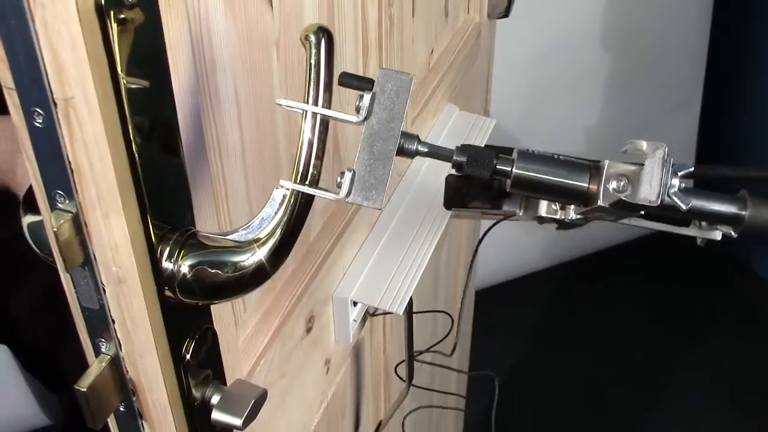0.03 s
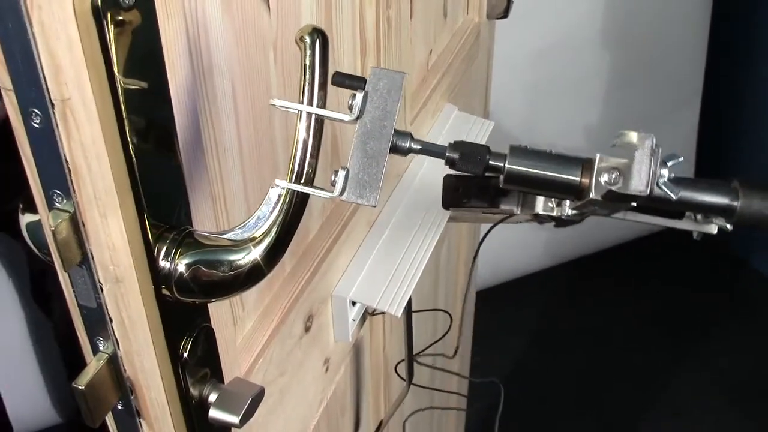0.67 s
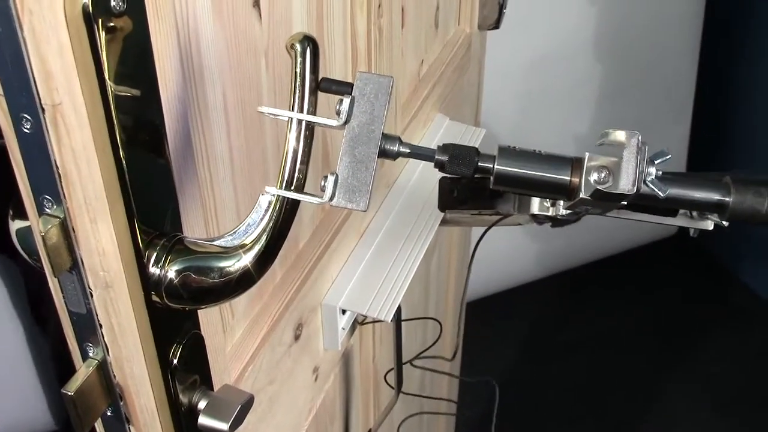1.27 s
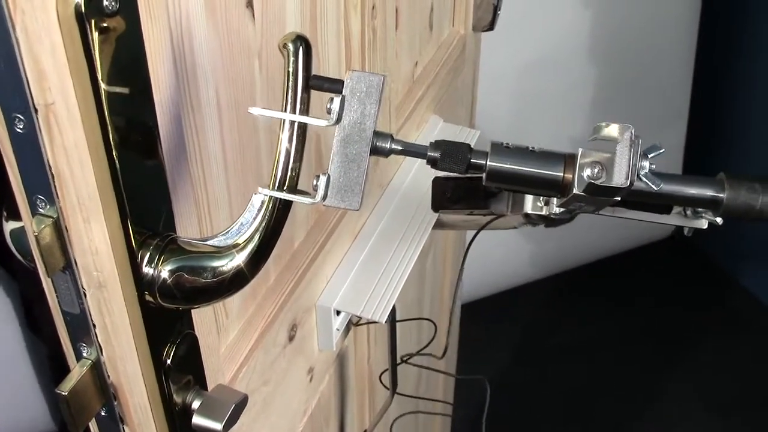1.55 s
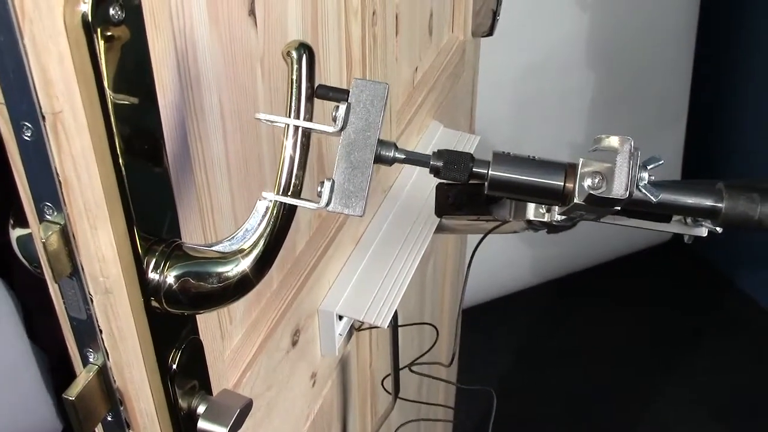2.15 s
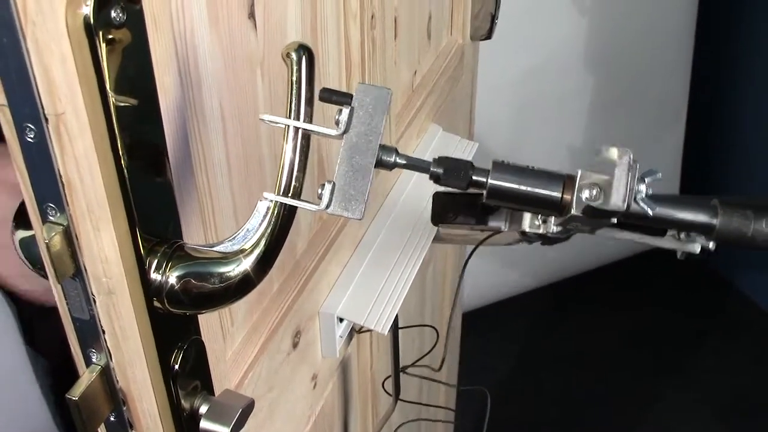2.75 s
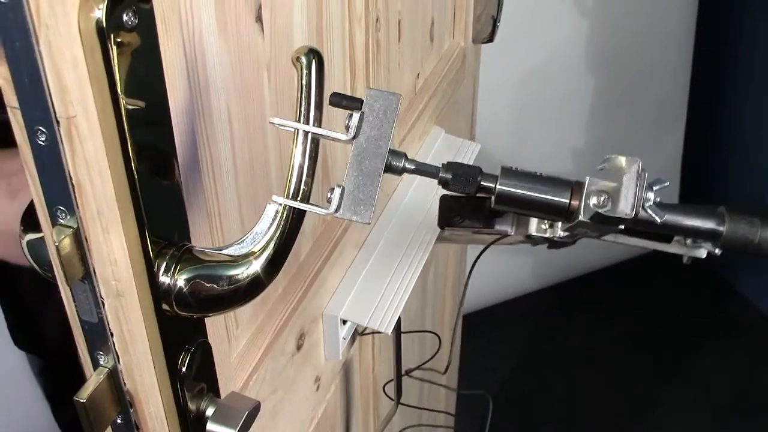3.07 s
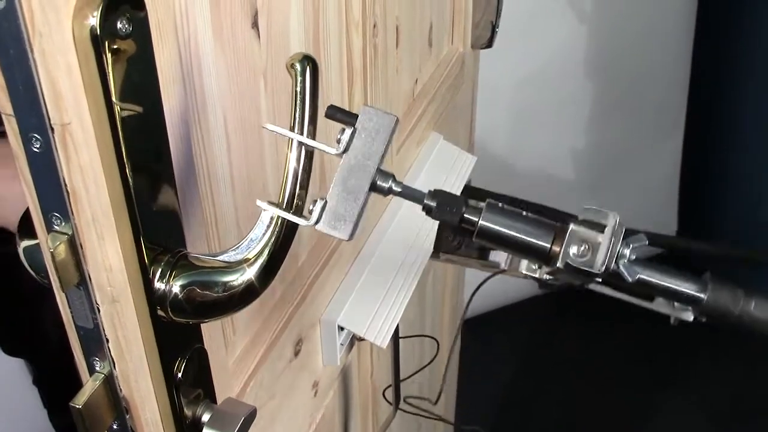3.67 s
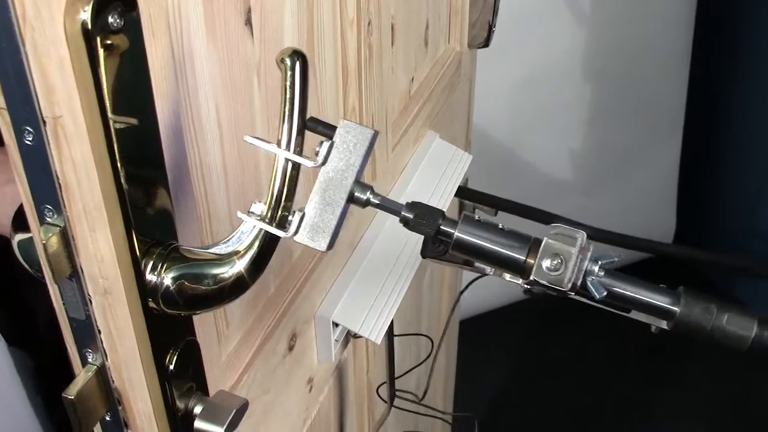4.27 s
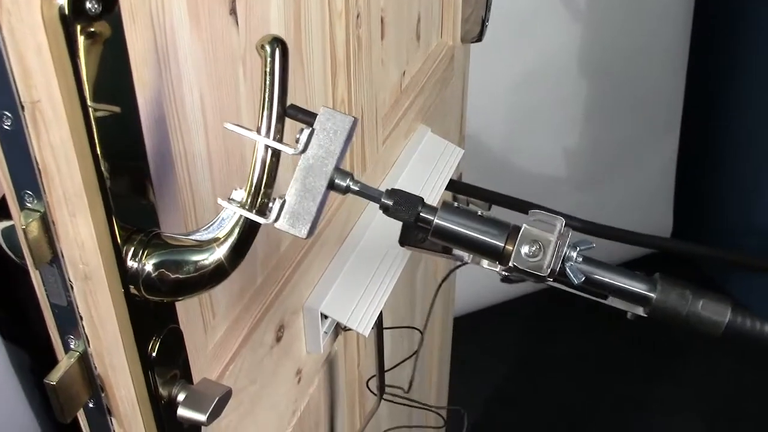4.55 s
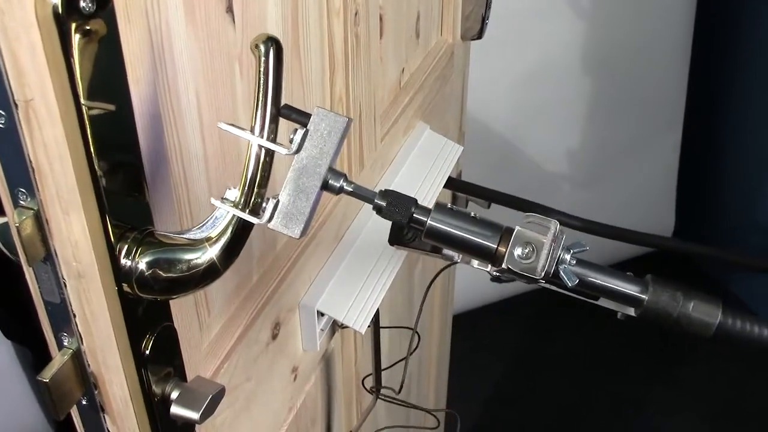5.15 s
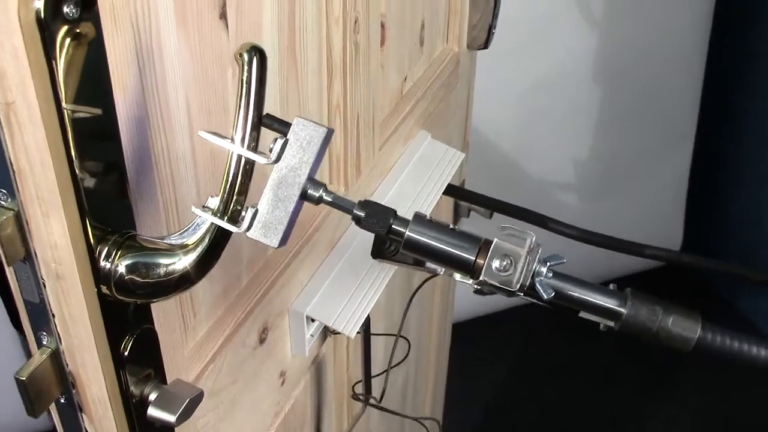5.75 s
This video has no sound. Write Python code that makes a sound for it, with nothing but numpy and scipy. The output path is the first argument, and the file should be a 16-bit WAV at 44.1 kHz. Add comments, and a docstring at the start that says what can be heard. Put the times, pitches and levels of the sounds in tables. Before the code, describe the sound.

A metal fork on a flexible shaft is worked against a door handle in a small room, over faint air noise and electrical hum. The shaft rubs in soft swells about once a second. Two light clinks and some dull taps open, followed by a clack at 0.8 seconds. At 1.5 seconds the latch gives a tiny squeak, snaps and knocks the wooden door. Small lock ticks follow, and a louder snap and knock come at 2.1 seconds. From 2.8 to 3.6 seconds the tool's joints clack and the fork skids briefly on the handle twice. The sharpest snap and knock land at 3.8 seconds, with a tick just after. At 4.6 seconds the shaft scrapes briefly through its sleeve and a steel coupling clanks home, ringing a little. Faint clacks, taps and a last soft rub come between 5.3 and 5.9 seconds.

```python
"""A metal fork on a flexible shaft is worked against the lever handle of a wooden door in a small room.
Over air and mains hum, the shaft rubs with each push. The fork clinks on the handle; the tool taps its
bracket, its joints clack. At 1.5 s the latch squeaks, snaps and knocks the door; it snaps and knocks
again at 2.1 and 3.8 s, with lock ticks, clacks and two skids of the fork between. At 4.6 s the shaft
scrapes through its sleeve and the coupling clanks home. Faint clacks, taps and a last push follow."""
import sys
import numpy as np
from scipy import signal
from scipy.fft import rfft, irfft
from scipy.io import wavfile
from scipy.ndimage import uniform_filter1d

SR = 44100
rng = np.random.default_rng(int(sys.argv[2]) if len(sys.argv) > 2 else 0)


def persist_wave(psi):
    """Save psi, clipped to +-1, as 16-bit WAV."""
    counts = np.round(np.clip(psi, -1, 1) * 32767).astype(np.int16)
    wavfile.write(sys.argv[1], SR, np.atleast_2d(counts).T)


N = 256220
TIME_S = np.arange(N) / SR
AGE_S = np.arange(32768) / SR
CUTOFF_HZ = 16000

# noise spectra of room air, friction, dense ringing of steel and wood: f/Hz, density/dB
AIR_SPECTRUM = [(12, -31), (20, -11.5), (34, -13), (55, -23), (96, -17.5), (150, -17), (193, -21),
                (248, -20), (388, -21.5), (780, -23.5), (1060, -29.5), (1440, -38), (3840, -63.5),
                (11400, -42.5), (16000, -52)]
RUB_SPECTRUM = [(59, -38), (100, 5.5), (433, -10), (492, -7), (736, -4), (970, -5), (1310, -3.5),
                (2220, -9.5), (2520, -9.5), (4020, -11.5), (7450, -17), (14700, -33), (16000, -35.5)]
STEEL_SPECTRUM = [(41, -56), (70, 9.5), (300, -4.5), (472, -10), (744, -2), (834, -1), (1370, -1.5),
                  (2660, -16), (2910, -6.5), (4800, -33.5), (7390, -25), (12700, -38.5), (16000, -83)]
WOOD_SPECTRUM = [(70, -16), (120, 0), (200, -4.5), (270, -5), (355, -8.5), (440, -6.5), (590, -5), (780, 1),
                 (1100, -12.5), (1800, -19.5), (3700, -25), (6000, -41), (9000, -27), (16000, -60)]
# mains hum: f/Hz, level/dB
HUM_PARTIALS = [(49.5, -57), (150, -59), (250, -61.5)]
# room decay: f/Hz, t60/s
ROOM_DECAY = [(100, 0.58), (300, 0.32), (1000, 0.51), (3500, 0.21), (8000, 0.34), (14000, 0.067)]
# stereo width: f/Hz, side gain/dB
AIR_SIDE = [(50, -36), (130, -5), (300, -2.5), (800, -6), (4000, 20), (14000, -13)]
SOURCE_SIDE = [(50, -13), (125, -49), (250, -26), (1000, -23.5), (2000, -23.5), (4000, -17), (8000, -13.5),
               (14000, -18)]

# modes: f/Hz, gain/dB, t60/s
SLEEVE_MODES = [(790, -6, 0.079), (1390, 4.5, 0.0053), (1560, -3, 0.063), (2140, 2, 0.04), (2875, 1, 0.027),
                (4540, -7, 0.11), (5330, -6, .08), (5820, 1.5, 0.033), (7070, -1, 0.019), (9300, -6, 0.025),
                (13400, -24, .02)]
LATCH_MODES = [(2990, 17.5, 0.0059), (3490, 17.5, 0.014), (5620, 3, 0.032), (7200, -22, .006),
               (8800, 15, 0.0085), (9900, -25.5, .006), (12700, -29, .008)]
# modes: f/Hz, gain/dB, base t60/s (shortened in use by t60_scale)
BRACKET_MODES = [(180, 3, 1), (1000, 0.5, 0.03), (1252, 1.5, 0.18), (1600, 2.5, 0.07), (1804, 1, 0.056),
                 (2200, -8, 0.079), (2670, -7, 0.089)]
FORK_MODES = [(1940, -9, 0.13), (2165, -10, 0.16), (2790, -4, 0.49), (3110, -7, 0.11), (3370, -7, 0.086),
              (3610, -6, 0.097), (5260, -13.5, 0.11), (6740, -3, 0.14), (8130, -1, 0.12), (8480, -9, .09),
              (15000, -20, .1)]
HANDLE_MODES = [(710, 4.5, 0.54), (1300, -4, 0.78), (1460, 1, 0.71), (1770, 4.5, 1), (2270, -6, 0.16),
                (3007, 7, 0.42), (3500, -0.5, 0.2), (6200, -36, .25), (7580, 6, 0.15), (8050, 3, 0.42)]
TOOL_MODES = [(298.4, -0.5, 0.52), (646, 4, 0.11), (758, 2.5, 0.42), (1023, -0.5, 0.33), (1121, 3, 0.42),
              (1377, 5.5, 0.21), (1710, -3, 0.026), (1992, -1, 0.094), (2062, -7.5, 0.16),
              (2242, -5.5, 0.42), (2400, -12, 0.35), (3014, -6, 0.22), (3360, -12, 0.61), (3860, -13, 0.18),
              (4440, -16.5, 0.7), (6650, -25, 0.3)]
COUPLING_MODES = [(266, 3, 0.12), (303, -5, 0.23), (672, 3, 0.38), (735, 1, 0.44), (1018, 7, 0.21),
                  (1160, 1, 0.41), (1377, 1.5, 0.11), (1524, 2.5, 0.72), (1840, -8, 0.46), (2007, 2, 0.053),
                  (2190, -2, 0.3), (2390, -24, .3), (2850, 0.5, 0.29), (3280, -10, .3), (4180, -7.5, 0.17),
                  (5640, -10, 0.1), (6260, -17, 0.22), (7600, -11, 0.2), (10200, -19, 0.15)]
DOOR_MODES = [(113, -5, 0.32), (129.4, 9, 0.54), (146, -6, 0.26), (416, -6, 0.14), (424, 1, 0.28),
              (535, -0.5, 0.91), (584, 1, 0.34), (586, -1, 0.85), (760, 4.5, 0.28), (780, 0, 0.16),
              (860, -10, 0.23), (1018, -14, 0.21), (1146, 2, 0.2), (1420, -13, 0.08), (2680, -25, 0.13),
              (2783, -14.5, 0.098), (3040, -45, 0.12), (3300, -20, 0.15), (3620, -5, 0.042),
              (5600, -44, 0.33)]

# band edges of the blows: f/Hz
METAL_EDGES_HZ = [100, 500, 1600, 5000, 16000]
COUPLING_EDGES_HZ = [190, 500, 1600, 5000, 16000]
DOOR_EDGES_HZ = [95, 200, 500, 1400, 3000, 6000, 16000]
# tone of each kind of blow: gain/dB per band
TAP_EQ_DB = [-3.5, 1.5, -2.5, -32]
CLINK_EQ_DB = [-16.5, -11, 0, -5.5]
SKID_EQ_DB = [-14.5, 0.5, 3, -2]
CLACK_EQ_DB = [-10.5, -1.5, -1, -15.5]
CLANK_EQ_DB = [-7.5, 0, 3, -6]
KNOCK_EQ_DB = [-5.5, -5.5, 0, -7, -8, -19]

# swells of rubbing: t/s at top speed, rise/s, fall/s, rumble/dB, hiss re rumble/dB
SHAFT_PUSHES = [(0.67, .1, 0.19, -41.5, -5), (1.92, 0.26, 0.16, -52.5, -1.5), (2.76, 0.1, 0.64, -51.5, -3),
                (3.68, 0.21, 0.24, -44.5, -2.5), (4.74, 0.16, 0.37, -48, 4.5), (5.81, .12, .1, -47.5, 3)]
# blows: t/s, level/dB before band gains, hardness/(dB/octave of treble)
BRACKET_TAPS = [(0.137, -42, 3.5), (0.374, -48, -6.5), (0.539, -45.5, -1.5), (1.192, -46.5, -6.5),
                (5.565, -50, 7), (5.772, -47.5, 4.5)]
FORK_CLINKS = [(0.112, -39.5, 0.1), (0.22, -40.5, 0.1)]
FORK_SKIDS = [(3.106, -39, 0.24), (3.572, -40, -1.1)]
JOINT_CLACKS = [(0.51, -48.5, 0), (0.787, -32.5, -5), (0.833, -43, -7), (2.783, -36.5, 4),
                (2.797, -28.5, -1), (3.237, -53.5, 3.5), (3.281, -33.5, 0), (3.348, -38.5, -2.5),
                (3.384, -40, -5), (4.441, -45.5, 1.5), (5.353, -50, 1), (5.387, -47.5, -2.5)]
COUPLING_CLANKS = [(4.681, -24, 0.06), (4.781, -37.5, -2)]
DOOR_KNOCKS = [(1.557, -25.5, -0.5), (2.109, -20.5, -1.5), (3.815, -21.5, 1)]
# ticks in the lock: t/s, centre f/Hz, peak/dB
LOCK_TICKS = [(1.227, 3500, -50), (1.775, 1820, -37.5), (1.834, 2800, -38.5), (2.291, 2340, -35),
              (3.799, 2980, -25), (3.802, 2180, -23.5), (3.996, 3600, -28)]
# latch stick-slip: t/s, length/s, start f/Hz, end f/Hz, level/dB
LATCH_SQUEAKS = [(1.511, 0.0076, 2170, 2270, -45), (1.536, 0.016, 2220, 2420, -36),
                 (1.551, 0.011, 2344, 2750, -18)]
# metal snaps: t/s, peak/dB
LATCH_SNAPS = [(1.5553, -20), (1.5626, -23), (1.569, -16.5), (2.1102, -12), (2.1146, -12.5), (2.12, -25),
               (3.8123, -16), (3.8155, -9), (3.8162, -5.5)]


def from_db(db):
    """Decibels to gain."""
    return 10 ** (np.asarray(db) / 20)


def unit(x):
    """Scale to energy 1."""
    return x / np.sqrt(np.sum(x ** 2) + 1e-20)


def at_hz(points, hz):
    """Table lookup on a log-frequency axis."""
    f, value = np.transpose(points)
    return np.interp(np.log(np.maximum(hz, 1)), np.log(f), value)


def band(x, low_hz, high_hz):
    """Causal band-pass."""
    return signal.sosfilt(signal.butter(3, [low_hz, high_hz], "band", fs=SR, output="sos"), x + 1e-18)


def colour(x, spectrum):
    """Zero-phase filter from a dB curve."""
    hz = np.arange(len(x) // 2 + 1) * SR / len(x)
    return irfft(rfft(x) * from_db(at_hz(spectrum, hz)), len(x))


def noise(spectrum, size=N):
    """Coloured noise, rms 1."""
    return unit(colour(rng.standard_normal(size), spectrum)) * np.sqrt(size)


def fade(t60_s):
    """Exponential decay."""
    return np.exp(-np.log(1000) * AGE_S / t60_s)


def burst(t60_s):
    """Decaying white noise, energy 1."""
    return unit(rng.standard_normal(len(AGE_S)) * fade(t60_s))


def ring(drive, modes, t60_scale=1):
    """Driven two-pole resonators, summed to energy 1."""
    out = 0
    for hz, db, t60_s in modes:
        r = np.exp(-np.log(1000) / (t60_scale * t60_s * SR))
        poles = [1, -2 * r * np.cos(2 * np.pi * hz / SR), r * r]
        out = out + from_db(db) * unit(signal.lfilter([1, -1], poles, drive + 1e-18))
    return unit(out)


def add(track, t_s, sound):
    """Mix a sound in at t_s."""
    start = round(t_s * SR)
    track[start:start + len(sound)] += sound[:N - start]


def stereo(mid, side, width):
    """Left and right from mid and coloured side."""
    side = colour(side, width)
    return np.array([mid + side, mid - side])


def tail(spectrum, early_t60_s, early_db):
    """Dense weak modes and reflections: an early decay, quicker in the treble, plus the room's."""
    wash = noise(spectrum, len(AGE_S))
    edges_hz = np.geomspace(60, 18000, 7)
    out = 0
    for low, high in zip(edges_hz, edges_hz[1:]):
        hz = np.sqrt(low * high)
        early = from_db(early_db) * fade(early_t60_s * (2000 / hz) ** 0.45)
        out = out + band(wash, low, high) * (early + fade(at_hz(ROOM_DECAY, hz)))
    return unit(out)


def contacts(chatter_s, rebound_db, rebounds):
    """First touch and uneven rebounds."""
    clicks = np.zeros(len(AGE_S))
    t_s = (np.arange(rebounds) + rng.random(rebounds)) / rebounds * chatter_s
    gains = from_db(rebound_db + rng.normal(0, 0.84, rebounds))
    clicks[(t_s * SR).astype(int)] = gains * rng.choice([-1, 1], rebounds)
    clicks[0] = 1
    return unit(clicks)


def blows(events, modes, spectrum, edges_hz, eq_db, *,
          chatter_s, rebounds, rebound_db, ring_db, top_hz, early_t60_s, early_db):
    """Each blow rings the struck part and the room; harder contact is brighter."""
    out = np.zeros(N)
    onset = round(.04 * SR)
    softness = signal.butter(3, top_hz, fs=SR, output="sos")   # contact time limits the top
    for t_s, level_db, hardness in events:
        clicks = contacts(chatter_s, rebound_db, rebounds)
        wash = unit(signal.fftconvolve(clicks, tail(spectrum, early_t60_s, early_db))[:len(AGE_S)])
        drive = clicks + from_db(-0.5) * burst(0.25)   # reflections make each ring waver
        varied_modes = [(hz, db + rng.standard_normal(), t60_s) for hz, db, t60_s in modes]
        rings = ring(drive, varied_modes, t60_scale=0.42)
        hit = signal.sosfilt(softness, wash + from_db(ring_db) * rings)
        for low, high, db in zip(edges_hz, edges_hz[1:], eq_db):
            part = band(hit, low, high)
            treble_octaves = max(np.log2(np.sqrt(low * high) / 1220), 0)   # above 1220 Hz
            gain = from_db(level_db + db + hardness * treble_octaves)
            add(out, t_s, gain * part / part[:onset].std())
    return out


def room_tone(air_db=-54):
    """Diffuse still air and mains hum."""
    hum = sum(from_db(db) * np.sin(2 * np.pi * (hz * TIME_S + rng.random())) for hz, db in HUM_PARTIALS)
    return from_db(air_db) * stereo(noise(AIR_SPECTRUM), noise(AIR_SPECTRUM), AIR_SIDE) + hum


def widen(mid):
    """Early reflections set left and right apart."""
    return stereo(mid, signal.fftconvolve(mid, burst(.12))[:N], SOURCE_SIDE)


def shaft_rub(rest_rumble_db=-57, rest_hiss_db=-60, grain_db=1.0, ring_db=-8, split_hz=2200):
    """Grainy friction swells with each push and faintly rings the tool."""
    rumble, hiss = from_db(rest_rumble_db), from_db(rest_hiss_db)   # never quite still in the hand
    for peak_s, rise_s, fall_s, db, hiss_db in SHAFT_PUSHES:
        speed = np.exp(-np.abs(TIME_S - peak_s) / np.where(TIME_S < peak_s, rise_s, fall_s))
        rumble = np.hypot(rumble, from_db(db) * speed)
        hiss = np.hypot(hiss, from_db(db + hiss_db) * speed)
    grain = uniform_filter1d(rng.standard_normal(N), size=200)
    friction = noise(RUB_SPECTRUM) * from_db(grain_db * grain / grain.std())
    rubbing = unit(friction) + from_db(ring_db) * ring(friction, TOOL_MODES, t60_scale=0.5)
    low, high = band(rubbing, 129, split_hz), band(rubbing, split_hz, CUTOFF_HZ)
    return low / low.std() * rumble + high / high.std() * hiss


def sleeve_scrape(start_s=4.562, stop_s=4.68, attack_s=0.029, release_s=0.018, level_db=-33, hiss_db=-4):
    """Even sliding rings the sleeve until the coupling lands."""
    attack = np.clip((TIME_S - start_s) / attack_s, 0, 1)
    release = np.clip(1 - (TIME_S - stop_s) / release_s, 0, 1)
    rings = ring(rng.standard_normal(N), SLEEVE_MODES)
    scrape = rings + from_db(hiss_db) * unit(noise(RUB_SPECTRUM))
    return from_db(level_db) * scrape / scrape.std() * attack * release


def bracket_taps():
    """The tool taps its damped bracket: dull."""
    return blows(BRACKET_TAPS, BRACKET_MODES, STEEL_SPECTRUM, METAL_EDGES_HZ, TAP_EQ_DB,
                 chatter_s=0.018, rebounds=5, rebound_db=-6.5,
                 ring_db=-3, top_hz=5950, early_t60_s=0.035, early_db=10.5)


def fork_clinks():
    """Brief contact with the handle rings the fork."""
    return blows(FORK_CLINKS, FORK_MODES, STEEL_SPECTRUM, METAL_EDGES_HZ, CLINK_EQ_DB,
                 chatter_s=0.0045, rebounds=3, rebound_db=-16,
                 ring_db=0, top_hz=15000, early_t60_s=0.031, early_db=6)


def fork_skids():
    """The fork skids: a dense run of contacts rings the handle."""
    return blows(FORK_SKIDS, HANDLE_MODES, RUB_SPECTRUM, METAL_EDGES_HZ, SKID_EQ_DB,
                 chatter_s=0.032, rebounds=40, rebound_db=0,
                 ring_db=-5.5, top_hz=16000, early_t60_s=0.03, early_db=7.5)


def joint_clacks():
    """Chattering joints ring the tool."""
    return blows(JOINT_CLACKS, TOOL_MODES, STEEL_SPECTRUM, METAL_EDGES_HZ, CLACK_EQ_DB,
                 chatter_s=0.0135, rebounds=6, rebound_db=-1,
                 ring_db=4, top_hz=10600, early_t60_s=0.017, early_db=0)


def coupling_clanks():
    """The steel coupling lands home and rings."""
    return blows(COUPLING_CLANKS, COUPLING_MODES, STEEL_SPECTRUM, COUPLING_EDGES_HZ, CLANK_EQ_DB,
                 chatter_s=0.018, rebounds=6, rebound_db=-8.5,
                 ring_db=0, top_hz=10400, early_t60_s=0.21, early_db=14)


def lock_squeaks_and_ticks(tick_t60_s=0.016, edge_ratio=1.156, room_t60_s=0.24, room_db=-3):
    """Stick-slip chirps and dry ticks, hanging on in the room."""
    out = np.zeros(N)
    for t_s, length_s, start_hz, end_hz, db in LATCH_SQUEAKS:
        hz = np.linspace(start_hz, end_hz, round(length_s * SR))
        chirp = np.sin(2 * np.pi * np.cumsum(hz) / SR)
        add(out, t_s, from_db(db) * signal.windows.tukey(len(hz), .5) * chirp)
    for t_s, hz, peak_db in LOCK_TICKS:
        click = burst(tick_t60_s)
        tick = band(click, hz / edge_ratio, hz * edge_ratio) + from_db(-17.5) * band(click, 410, 6400)
        add(out, t_s, from_db(peak_db) * tick / np.abs(tick).max())
    return out + from_db(room_db) * signal.fftconvolve(out, burst(room_t60_s))[:N]


def latch_snaps():
    """Steel on steel: very short, bright."""
    out = np.zeros(N)
    for t_s, peak_db in LATCH_SNAPS:
        clicks = contacts(chatter_s=0.0011, rebound_db=-1, rebounds=4)
        snap = band(ring(clicks, LATCH_MODES), 750, 14500)
        add(out, t_s, from_db(peak_db) * snap / np.abs(snap).max())
    return out


def door_knocks():
    """The latch strikes and rings the wooden door."""
    return blows(DOOR_KNOCKS, DOOR_MODES, WOOD_SPECTRUM, DOOR_EDGES_HZ, KNOCK_EQ_DB,
                 chatter_s=0.022, rebounds=5, rebound_db=-1.5,
                 ring_db=2, top_hz=11100, early_t60_s=0.13, early_db=-5)


def scene():
    """Door, tool and room in stereo."""
    mid = door_knocks() + joint_clacks() + bracket_taps() + coupling_clanks()
    mid += fork_clinks() + fork_skids()
    mid += latch_snaps() + lock_squeaks_and_ticks()
    mid += sleeve_scrape() + shaft_rub()
    return widen(mid) + room_tone()


def record(dry):
    """Steep low-pass, small converter DC offset."""
    return signal.sosfilt(signal.ellip(10, .1, 80, CUTOFF_HZ, fs=SR, output="sos"), dry) + .0097


dry = scene()
out = record(dry)
persist_wave(out)
```